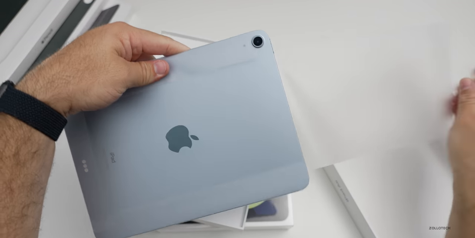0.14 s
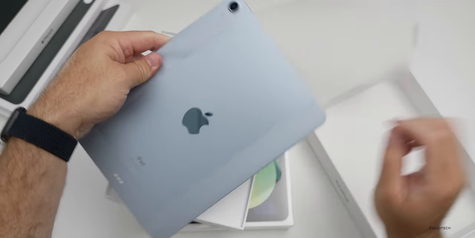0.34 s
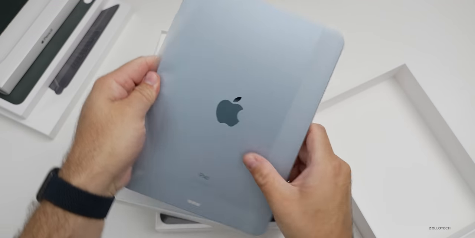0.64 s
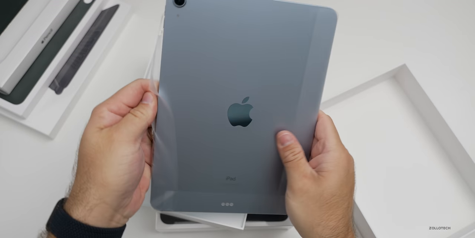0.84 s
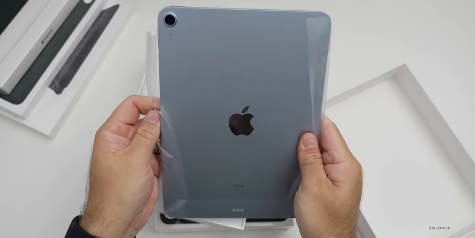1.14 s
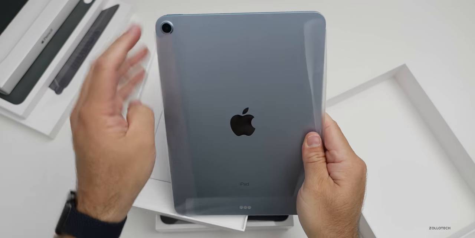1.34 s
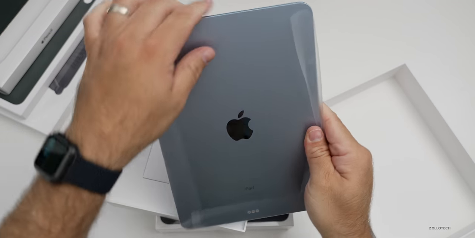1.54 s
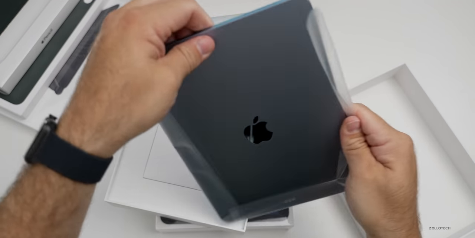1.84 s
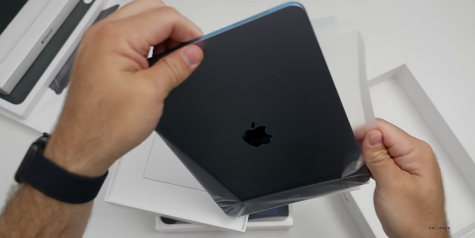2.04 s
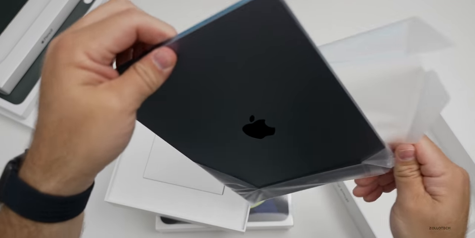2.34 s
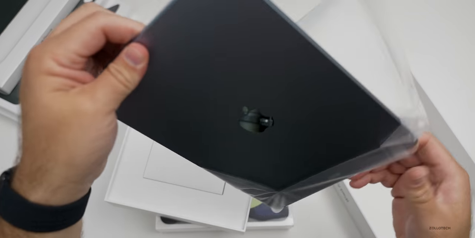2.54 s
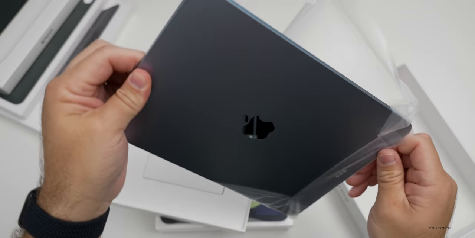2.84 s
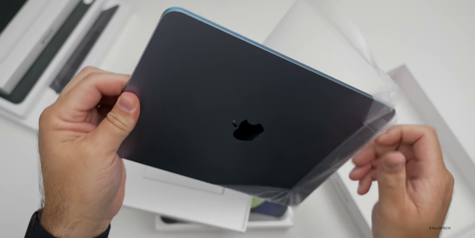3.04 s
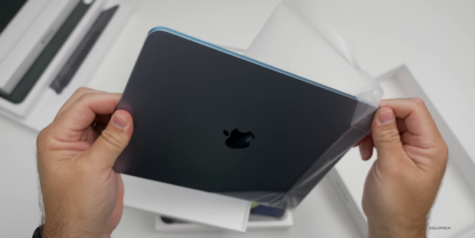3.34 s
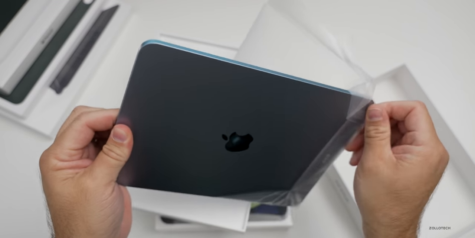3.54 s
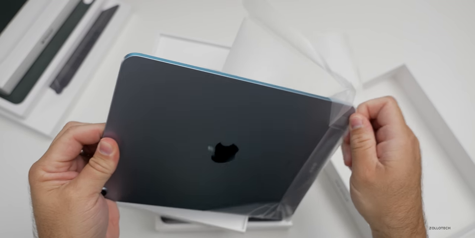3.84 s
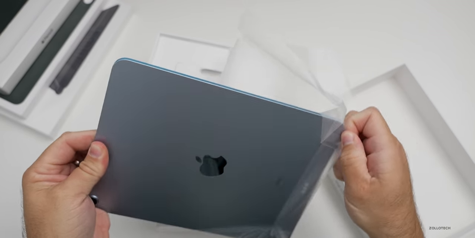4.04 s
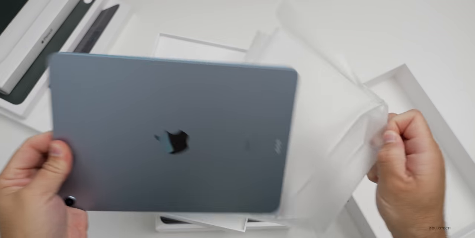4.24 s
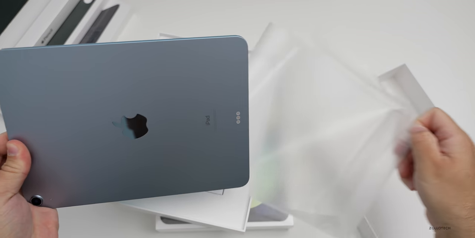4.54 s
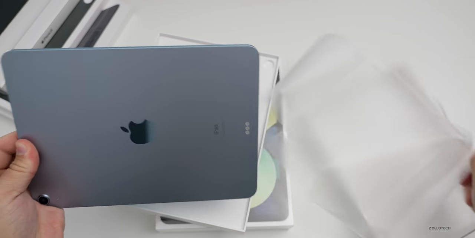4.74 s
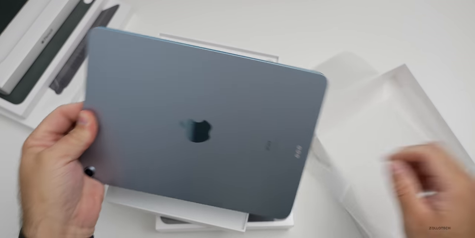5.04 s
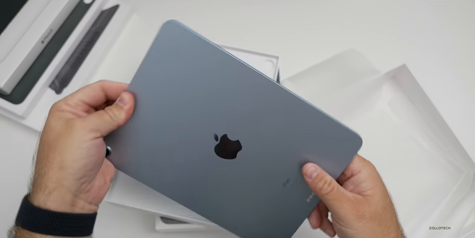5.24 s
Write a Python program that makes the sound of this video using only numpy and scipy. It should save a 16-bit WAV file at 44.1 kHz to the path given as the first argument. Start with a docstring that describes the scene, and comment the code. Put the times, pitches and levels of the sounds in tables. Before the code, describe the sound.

Dry, bright crackling of a thin plastic sheet, uneven and jerky, with fine crinkle coming and going beneath sharp little snaps. The busiest stretch fills roughly 1.8 to 2.6 seconds; later there are separate ticks, a short strong tear-like burst at 4.2 and a few pops at 4.5. Occasional dull low flaps. Close microphone, quiet small room with low rumble and faint hiss.

```python
"""Bright snaps of plastic film and a few dull flaps, mixed throughout with a fine crinkle that comes and goes,
over a low room hum: a thin film is peeled off a tablet on a desk, close to the microphone, in a small quiet room.
The crinkle is thousands of random slips coloured by crease size; each snap is a noise burst through resonances.
Flaps are short low tones with a breath of noise; desk and walls answer the film with echoes and a short tail."""
import sys
import numpy as np
from scipy import signal
from scipy.fft import rfft, irfft
from scipy.io import wavfile
from scipy.ndimage import uniform_filter1d

SR = 44100
rng = np.random.default_rng(int(sys.argv[2]) if len(sys.argv) > 2 else 0)


def output_pcm(signal):
    """Save a mono or channel-first signal as 16-bit PCM at the path in sys.argv[1].

    Samples are clipped to [-1, 1] before scaling.
    """
    pcm = np.clip(np.atleast_2d(signal).T, -1, 1) * 32767
    wavfile.write(sys.argv[1], SR, np.round(pcm).astype(np.int16))


N = 238272  # length in samples


def gain_of(db):
    """Amplitude factor of a level in dB."""
    return 10 ** (np.asarray(db) / 20)


def evened(x):
    """Scale to an RMS of 1."""
    return x / np.sqrt(np.mean(x ** 2) + 1e-20)


def read_curve(points, hz):
    """Read a (f/Hz, value) curve along a logarithmic frequency axis."""
    f, value = np.transpose(points)
    return np.interp(np.log(hz + 1), np.log(f + 1), value)


def add(mix, start_s, sound):
    """Mix a sound in from its start time, cut at the end of the mix."""
    part = mix[round(start_s * SR):][:len(sound)]
    part += sound[:len(part)]


def ring(x, hz, width_hz):
    """A causal resonance of gain 1 at its centre."""
    return signal.lfilter(*signal.iirpeak(hz, hz / width_hz, SR), x)


def dull(x, hz):
    """Thick folds give little above their own pitch: a gentle low-pass."""
    return signal.sosfilt(signal.butter(2, min(hz, 15000), fs=SR, output="sos"), x)


# Tugs and slides that set the film crinkling: [t/s at full strength, hold/s, level/dB,
# large folds/dB, fine wrinkles/dB (scaled for the middle size), sheet/dB, grain 0-1]
TUGS = [(0, 0.019, -54.5, -9, -10, -5, 0.33), (0.457, 0.11, -71.5, 3.5, -24, -7, 0.2),
        (0.555, 0.094, -72, -4, -3, -8, 0), (0.718, .02, -75.5, -6, -4, -15, 0.2),
        (0.794, 0.042, -64.5, -3, -1.5, -19, 0.76), (0.901, 0.0074, -45.5, -34, -9.5, -15, 0.82),
        (1.046, 0.024, -55.5, -10, -17, -15, 0.72), (1.16, 0.018, -57.5, -17, -7, -6, 1),
        (1.303, 0.0033, -49, -3, -0.5, -29, 0.45), (1.515, 0.22, -72.5, -5, -3.5, -8, 0.8),
        (1.783, 0.035, -60, -2, -8, -5, 0.34), (1.945, 0.088, -49.5, -5.5, 1.5, -9.5, 0.4),
        (2.015, 0.071, -42, -13, -5.5, -31, 0.8), (2.179, 0.0044, -44, -3.5, -16, -21, 0.6),
        (2.247, 0.041, -48.5, 0, 2.5, -14, 0.9), (2.434, .02, -47.5, -6.5, -7, -31, 0.7),
        (2.564, 0.049, -61.5, 4.5, -8, -13, 0.85), (2.797, 0.012, -72, -20, -2, -20, 0.1),
        (2.867, 0.022, -72.5, 0, -3, -20, 0.2), (2.941, .1, -60.5, -20, -6, -17, 0.2),
        (3.142, 0.073, -66, -11, -5, -8, 0.64), (3.345, .05, -79.5, -16, -0.5, -17, 0.3),
        (3.508, 0.016, -67.5, -12, 0.5, -11, 0.5), (3.693, 0.0088, -65, -10, -11, -8, 0.54),
        (3.809, 0.12, -72, -9, -11, -0.5, 0.4), (3.994, 0.095, -69, -4.5, -18, -5, 0.5),
        (4.146, 0.084, -47, -8, -7, -15, 0), (4.409, .03, -62, -16, -13, -10, 0.06),
        (4.625, 0.024, -61, -6, -3, -12, 0.9), (4.701, 0.077, -71.5, -6, -4, 2.5, 0.07),
        (4.842, 0.14, -63, -10, -9, -3, 0), (5.02, 0.12, -68, -5.5, -23, -24, 0),
        (5.179, 0.0091, -60, -9, -12, -2.5, 0.16), (5.259, .02, -66, 0, -11, 7.5, 0.15),
        (5.33, .08, -53.5, -3.5, -29, -7.5, 0)]
SWELL_DB_PER_S, SETTLE_DB_PER_S, REST_DB = 338, 282, -102.5


def tugs():
    """Every tug swells, holds and settles alike; the stronger it is, the more it sets the colour."""
    peak_s, hold_s, level_db, *colours = np.transpose(TUGS)[:, :, None]
    t = np.arange(0, N / SR + .01, .002)
    swell_db = SWELL_DB_PER_S * np.maximum(peak_s - t, 0)
    settle_db = SETTLE_DB_PER_S * np.maximum(t - peak_s - hold_s, 0)
    power = gain_of(2 * (level_db - swell_db - settle_db))
    total_db = 10 * np.log10(power.sum(0) + gain_of(2 * REST_DB))
    blends = [(power * colour).sum(0) / power.sum(0) for colour in colours]
    return [np.interp(np.arange(N) / SR, t, curve) for curve in [total_db] + blends]


def pops(grain, clumps):
    """Small slips of uneven size; the grainier the motion, the more they differ and clump."""
    slips_per_s = 7000
    unevenness = 1.84 * np.minimum(rng.exponential(1, N), 5)
    size = gain_of(grain * (unevenness + 8.0 * clumps))
    slips = size * rng.standard_normal(N) * (rng.random(N) < slips_per_s / SR)
    running_power = uniform_filter1d(slips ** 2, size=4096)
    return slips / np.sqrt(running_power + 1e-9)


# The sheet as a drum, its low modes: [f/Hz, width/Hz, level/dB]
SHEET_MODES = [(372, 350, 3), (672, 82, 7.5), (1520, 2140, 3.5)]


def drum(x):
    """The low modes of the whole sheet."""
    return sum(gain_of(db) * ring(x, hz, width_hz) for hz, width_hz, db in SHEET_MODES)


# Colour the film gives its crinkle: [f/Hz, level/dB per Hz]
FILM_COLOUR = [(900, -10.5), (2200, 5), (3200, 10), (4700, 10.5), (6500, 4), (9000, 6), (11500, -11.5),
               (14000, -6), (16000, -14)]
# Crease sizes, large folds to finest wrinkles: [f/Hz, spread/octaves]
CREASE_SIZES = [(1900, 0.66), (4300, 0.49), (7200, 0.82), (12500, 0.91)]


def crinkle():
    """Small creases pop high and large ones low, each size at its own moments; the film colours them."""
    level_db, folds_db, wrinkles_db, sheet_db, grain = tugs()
    # one jerky pull drives every size
    clumps = evened(signal.lfilter([1], [1, -.992], rng.standard_normal(N)))
    trains = np.array([pops(np.clip(grain, 0, 1), clumps) for _ in CREASE_SIZES])
    hz, _, spectra = signal.stft(trains, SR, nperseg=256, noverlap=192)

    film_gain = gain_of(read_curve(FILM_COLOUR, hz))
    bands = []
    for f, spread in CREASE_SIZES:
        octaves = np.log2((hz + 1) / f)
        bands.append(np.exp(-(octaves / spread) ** 2 / 2) * film_gain)
    bands = np.array(bands)
    bands /= np.sqrt(np.mean(bands ** 2, axis=1, keepdims=True))

    # each patch of film has its own pitch, so the colour flickers
    patches = uniform_filter1d(rng.standard_normal(spectra.shape[1:]), size=16, axis=0)
    patches = evened(uniform_filter1d(patches, size=4, axis=1))
    coloured = spectra * bands[:, :, None] * gain_of(3.13 * patches)
    sizes = signal.istft(coloured, SR, nperseg=256, noverlap=192)[1][:, :N]

    film = gain_of(folds_db) * sizes[0] + sizes[1]
    film += gain_of(0.5 + 0.32 * wrinkles_db) * sizes[2]
    film += gain_of(wrinkles_db) * sizes[3]
    sheet = gain_of(sheet_db) * evened(drum(trains[0]))
    return gain_of(level_db) * (film + sheet)


# Colour of the rumble and hiss before levelling: [f/Hz, level/dB per Hz]
HUM_COLOUR = [(12, -46), (20, -1), (45, -3.5), (66, 7), (100, -0.5), (123, 3.5), (150, -10.5), (190, -7),
              (314, -23.5), (430, -21.5), (990, -34.5), (5000, -37), (9000, -45), (13900, -43),
              (16500, -55)]
HUM_DB = -56  # RMS level


def hum():
    """The building's low rumble and the microphone's faint hiss, as steady shaped noise."""
    hz = np.fft.rfftfreq(N, 1 / SR)
    spectrum = rfft(rng.standard_normal(N)) * gain_of(read_curve(HUM_COLOUR, hz))
    return gain_of(HUM_DB) * evened(irfft(spectrum, N))


# Single reflections from desk and walls: [delay t/s, level/dB]
ECHOES = [(.0022, -23), (.0105, -15.5), (.0225, -42)]
# How fast the tail dies in each band: [f/Hz, t60/s]
ROOM_DECAY = [(400, 0.36), (1500, 0.22), (4500, 0.16), (10000, 0.11)]
ROOM_DB, ROOM_RISE_S = -13, 0.0054


def room(x):
    """A few dulled single echoes, and sparse taps of random sign whose bands die at their own speed."""
    taps = np.zeros(SR // 2)
    slots = np.arange(0, len(taps) - 20, 20)
    taps[slots + rng.integers(0, 20, len(slots))] = rng.choice([-1., 1.], len(slots))
    hz, t, spectrum = signal.stft(taps, SR, nperseg=256)
    decay = gain_of(-60 * t / read_curve(ROOM_DECAY, hz)[:, None])
    tail = signal.istft(spectrum * decay, SR, nperseg=256)[1][:len(taps)]
    # reflections thicken over the first moments
    tail *= 1 - np.exp(-np.arange(len(tail)) / SR / ROOM_RISE_S)
    answer = gain_of(ROOM_DB) * tail / np.linalg.norm(tail)
    for k, (delay_s, db) in enumerate(ECHOES):
        # signs alternate; two neighbouring samples dull the echo
        add(answer, delay_s, (-1) ** k * gain_of(db) * np.array([.7, .3]))
    return x + signal.fftconvolve(x, answer)[:N]


# The sheet flaps or a hand lands: [t/s, level/dB, f/Hz, t60/s]
FLAPS = [(0.019, -41.5, 92.5, 0.031), (1.263, -32.5, 127, 0.026), (1.266, -40.5, 386, 0.036),
         (1.33, -39, 101, 0.028), (1.948, -46, 327, 0.037), (2.264, -42, 320, 0.056),
         (2.432, -37.5, 310, 0.021), (2.554, -42, 202, 0.022), (4.135, -45, 114, 0.25),
         (4.235, -32.5, 122, 0.033), (5.29, -41, 39, 0.054), (5.316, -40.5, 492, 0.049)]


def flap(level_db, hz, t60_s):
    """A dull push of air: a fading low tone with a band of noise an octave above."""
    t = np.arange(8192) / SR
    breath = evened(ring(rng.standard_normal(len(t)), 2 * hz, 2 * hz))
    push = np.sin(2 * np.pi * hz * t) + 0.34 * breath
    onset = 1 - np.exp(-t / 0.00075)
    return gain_of(level_db - 60 * t / t60_s) * onset * push


# Creases that buckle: [t/s, level/dB, crease f/Hz, sheet/dB and edge/dB relative to level,
# length/ms (limited to 0.3-12 when played)]
SNAPS = [(0.0265, -34.5, 3640, -15, -13, 1.8), (.0424, -41.5, 3620, -10, -17, 3.8),
         (0.1554, -50, 5240, -7, -3, 1.8), (.1604, -36.5, 4770, -15, -9, 2),
         (0.1705, -45.5, 4030, -2.5, -21, 16), (0.438, -53, 3570, -5.5, -8, 6.2),
         (0.51, -53, 5760, -12, -19, 3), (0.5581, -40.5, 7700, -46, -27, 1.5),
         (0.784, -44, 3430, -25, -8.5, 4.9), (0.793, -51, 3380, -25, -15, 1.9),
         (0.8259, -38.5, 5860, -22, -8, 6.4), (0.836, -49, 3030, -30, -4, 2.9),
         (0.883, -39, 4500, -38, -4, 7.5), (0.9217, -35.5, 3100, -15.5, -3, 3.9),
         (1.041, -49, 4030, -28, -14, 2.8), (1.054, -47, 3660, -26, -18, 2.6),
         (1.0719, -41.5, 4300, -22, -7, 2.7), (1.0797, -46.5, 3540, -10, -22, 11),
         (1.1529, -35, 4100, -27, -4.5, 2.3), (1.1634, -45.5, 2700, -9, -15, 4.6),
         (1.1851, -49, 3500, 3, -19, 2.2), (1.227, -46, 3500, -11, -14, 4.2),
         (1.2605, -43.5, 3300, -11, -5, 13), (1.266, -33.5, 4530, -4.5, -24, 1.6),
         (1.2832, -46.5, 5030, -6, 14.5, 1.9), (1.295, -37.5, 4800, -6.5, -21, 3.2),
         (1.3042, -26, 4930, -20, -4.5, 3.7), (1.3196, -31, 4660, -24, -15, 4.5),
         (1.3658, -58, 4800, -10, -9, 2.5), (1.515, -51, 4400, -8, -19, 5),
         (1.5202, -36, 4480, -19, -8, 2.7), (1.6318, -54, 2930, -6, -9, 6),
         (1.6611, -44.5, 4700, -13.5, -21, 8.8), (1.76, -46, 3400, -4.5, -18, 2.8),
         (1.786, -45.5, 8800, -5, -13, 3.6), (1.7935, -32.5, 5300, -25, -3, 2.7),
         (1.8059, -31, 3800, -29, -23, 3), (1.8567, -46.5, 5500, -23, -17, 5.8),
         (1.868, -45, 5400, -26, 0, 2.6), (1.875, -34.5, 5400, -30, -6, 2.2),
         (1.8827, -38, 5400, -23, -10, 4.6), (1.899, -37, 5030, -27, -8, 2.6),
         (1.924, -37, 4970, -12, -17, 2.6), (1.9341, -36, 4230, -16, -5, 7.7),
         (1.947, -43, 1960, 4, -13, 2.5), (1.9539, -33, 4100, -6, -13, 1.6),
         (1.979, -34.5, 6400, -10, -14, 4.6), (1.989, -38.5, 4660, -2, -21, 13),
         (2.011, -36, 4300, -27, -7, 3.3), (2.019, -35, 4800, -26, -3, 7.2),
         (2.0316, -29.5, 4570, -6.5, -8, 7.5), (2.0457, -35.5, 5000, -3.5, -4, 2.7),
         (2.0573, -30, 8200, -31, -17, 3.1), (2.0663, -36, 5700, -29, -9, 7.1),
         (2.0735, -30, 4840, -37, -9, 1.7), (2.0964, -36.5, 5050, -15, -3, 8.8),
         (2.1051, -42, 4950, -33, 5, 4.2), (2.137, -46, 5250, -29, -2, 6.6),
         (2.1691, -33.5, 3020, -37, -15, 12), (2.2036, -31, 5770, -11.5, -19, 2.9),
         (2.2326, -30.5, 4900, -22, -6, 11), (2.2657, -24.5, 4020, -15.5, -8, 11.5),
         (2.289, -42, 4700, -3, -1, 5.8), (2.2986, -38.5, 3580, -21, -7, 9.5),
         (2.314, -35.5, 4370, -15, -20, 2.1), (2.3875, -38, 3660, -19, -9, 7.1),
         (2.405, -48, 2570, -24, -3, 6.8), (2.4278, -40.5, 3550, 0, -21, 2.1),
         (2.436, -32, 4400, -7, -11, 3), (2.447, -39.5, 7700, -1, -14, 3.6),
         (2.4524, -30.5, 3450, -12, -20, 5.7), (2.4842, -39.5, 4270, -11, -16, 13),
         (2.5579, -38, 4800, -9, -20, 9.6), (2.5861, -31.5, 4350, -28, -11, 1.8),
         (2.6219, -55.5, 2800, 1, -21, 5.2), (2.7301, -50.5, 4100, -25, -10, 7.5),
         (2.7462, -37.5, 3680, -1, -3, 4.8), (2.9612, -29.5, 5100, -16.5, -23, 5),
         (2.9863, -29.5, 4830, -38, -10, 3), (3.0295, -45.5, 3820, -24, -8, 3.9),
         (3.068, -46.5, 5240, -19, -11, 3.8), (3.1558, -38.5, 4900, -34, -30, 1.7),
         (3.2144, -33, 4340, -32, -10.5, 1.5), (3.229, -46.5, 3400, -2.5, -8, 4.1),
         (3.4079, -33.5, 7550, -51, -31, 2.2), (3.4833, -38.5, 5800, -24, -9, 3.9),
         (3.499, -51, 4100, -24, -2, 5.2), (3.6978, -48.5, 5550, -8.5, -4, 2.2),
         (3.8544, -27, 5630, -32, -5.5, 2.8), (3.998, -55, 8800, -11, 1, 4.6),
         (4.0685, -44.5, 3900, -27, -10, 2.5), (4.1358, -37, 6100, -11.5, 0, 6.1),
         (4.1496, -38.5, 9800, -24, -5, 2.3), (4.2083, -30.5, 5500, -25, -9, 3.3),
         (4.2163, -28.5, 5400, -13, -2, 4.2), (4.2417, -26, 5500, -32, -24, 2.8),
         (4.5332, -30, 5600, -31, -9, 1.9), (4.5586, -47, 4300, -6, -26, 3.1),
         (4.5884, -31, 3470, -13, -14, 3), (4.5979, -38.5, 2440, -21, -19, 4.9),
         (4.617, -46, 3900, -20, -25, 2.8), (4.6365, -44, 3970, -10.5, -7.5, 3),
         (4.7064, -52.5, 2150, -12, -15, 7.9), (4.9639, -44.5, 3950, -19, -13, 2.3),
         (4.9752, -51, 3200, -14, -16, 4.5), (5.164, -55, 5100, -2.5, -10, 12),
         (5.1714, -52.5, 3900, -0.5, -8, 8), (5.2484, -49, 3960, -2.5, -8, 13),
         (5.3029, -34, 5940, -28, -22, 1.5), (5.3133, -35, 6000, -25, -11, .69),
         (5.33, -43, 4400, -19, -15, .83)]


def snap(level_db, hz, sheet_db, edge_db, length_ms):
    """A burst of tiny slips rings the crease, its sharp edge and the modes of the sheet."""
    t = np.arange(1536) / SR
    length_s = np.clip(length_ms, .3, 12) / 1000
    rise = 1 - np.exp(-t / .00015)
    fade = gain_of(-11 * t / length_s)  # down 11 dB after one length
    slips = rng.standard_normal(len(t)) * rise * fade

    crease = ring(slips, hz, 0.27 * hz) + 0.37 * ring(slips, 1.08 * hz, 1.49 * hz)
    crease = dull(crease, 2.06 * hz)
    edge = ring(ring(slips, 10500, 8000), 10500, 12000)
    sheet = dull(drum(slips), 4500)

    burst = 0
    for part_db, part in [(0, crease), (edge_db, edge), (sheet_db, sheet)]:
        # every part is scaled by its strongest millisecond
        strongest = np.sqrt(uniform_filter1d(part ** 2, size=44).max())
        burst = burst + gain_of(level_db + part_db) * part / strongest
    return burst


def scene():
    """Crinkle, flaps and snaps sound in the room; the hum is added outside it."""
    film = crinkle()
    for start_s, *settings in FLAPS:
        add(film, start_s, flap(*settings))
    for start_s, *settings in SNAPS:
        add(film, start_s, snap(*settings))
    return (room(film) + hum())[None]


EDGE_HZ = 15900  # upper band limit


def record(dry):
    """The band limit of the recorder: a steep low-pass."""
    lowpass = signal.firwin(511, EDGE_HZ, window=("kaiser", 9), fs=SR)
    return signal.oaconvolve(dry, lowpass[None], "same")


dry = scene()
out = record(dry)
output_pcm(out)
```